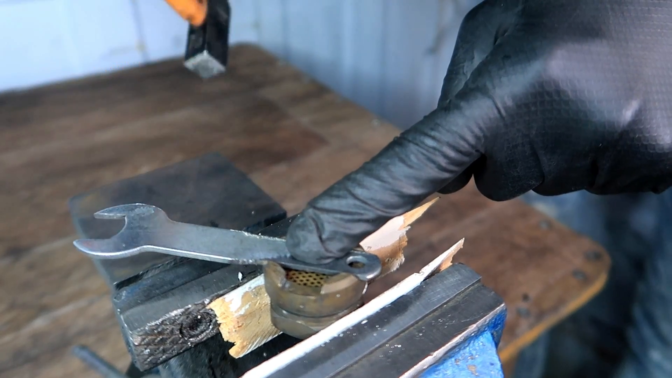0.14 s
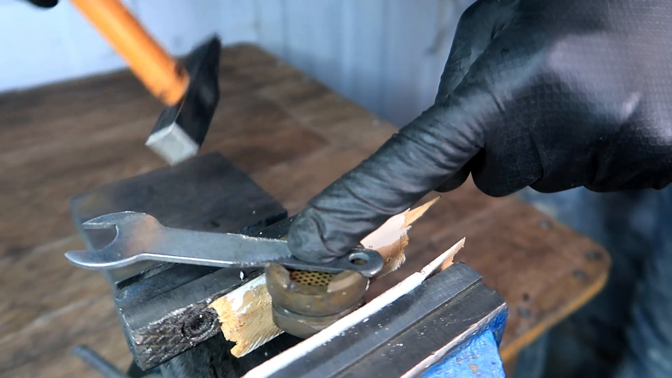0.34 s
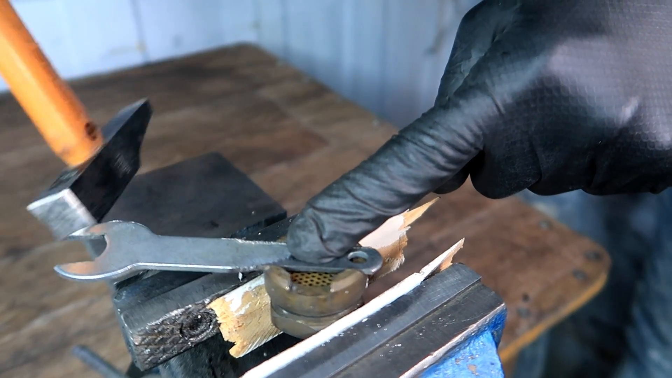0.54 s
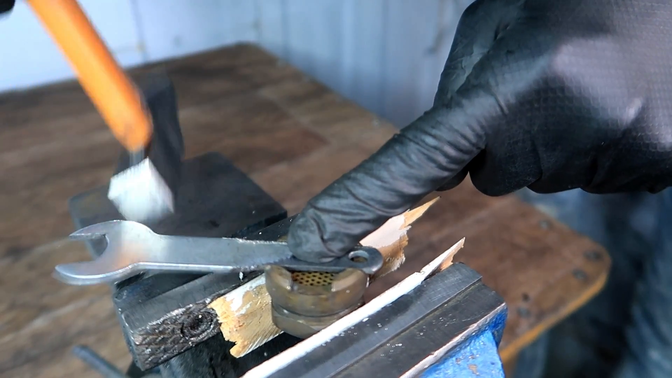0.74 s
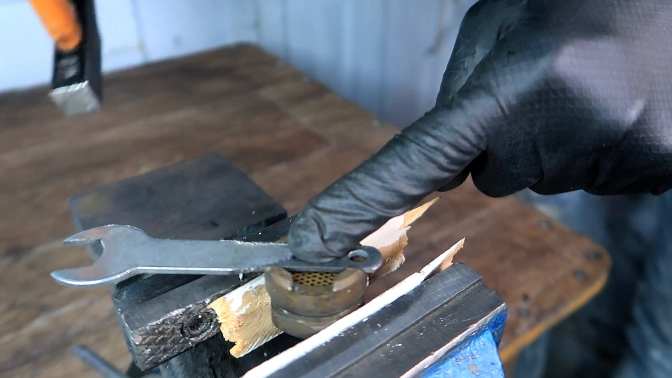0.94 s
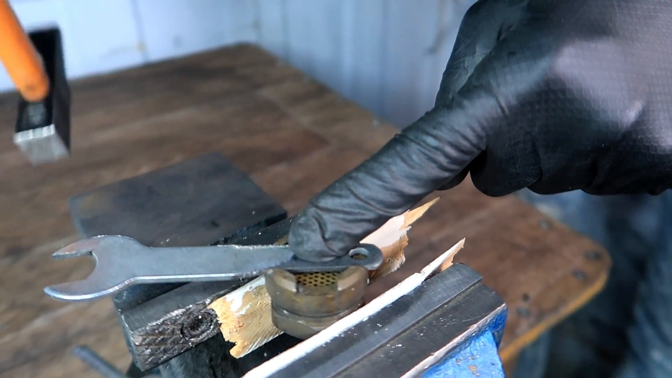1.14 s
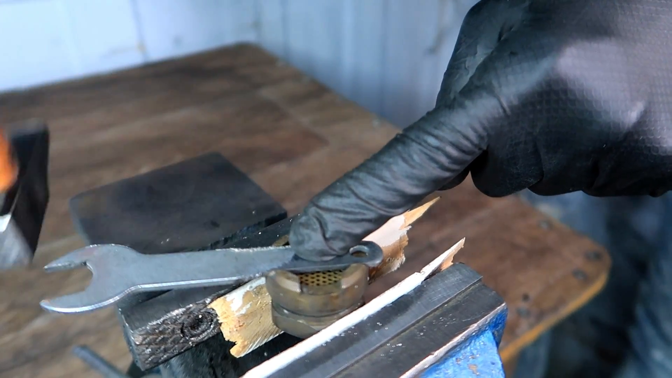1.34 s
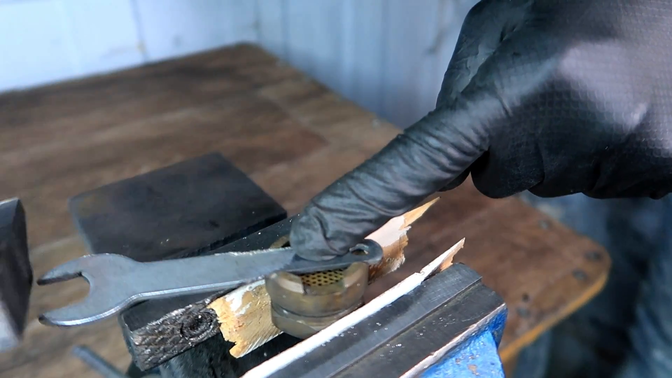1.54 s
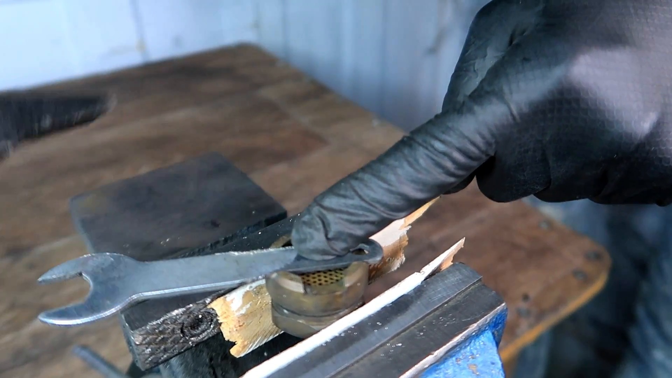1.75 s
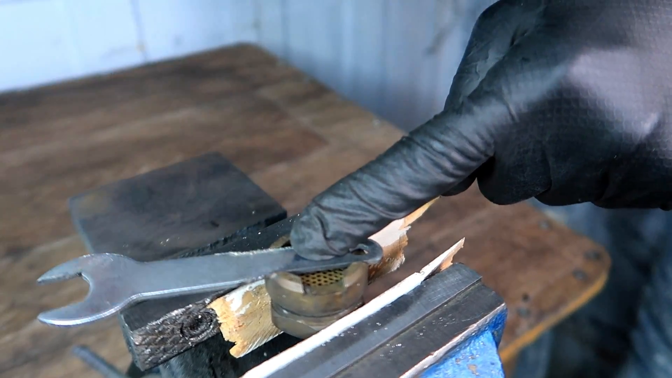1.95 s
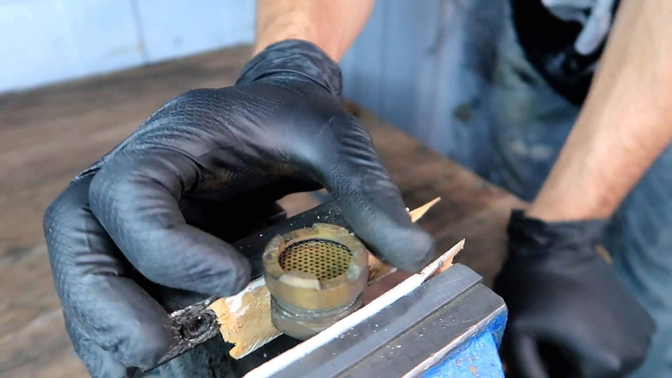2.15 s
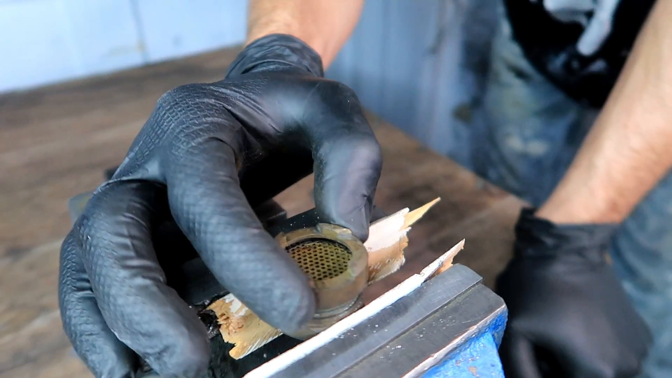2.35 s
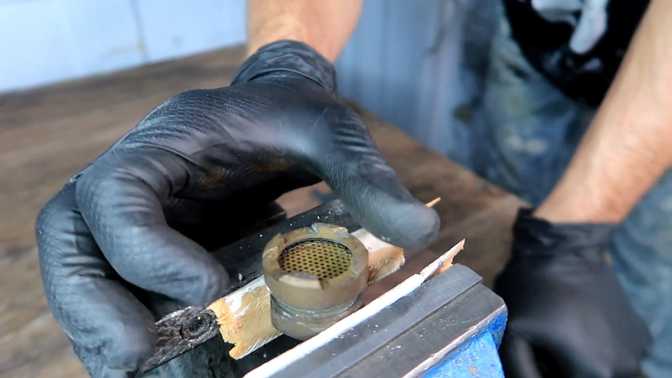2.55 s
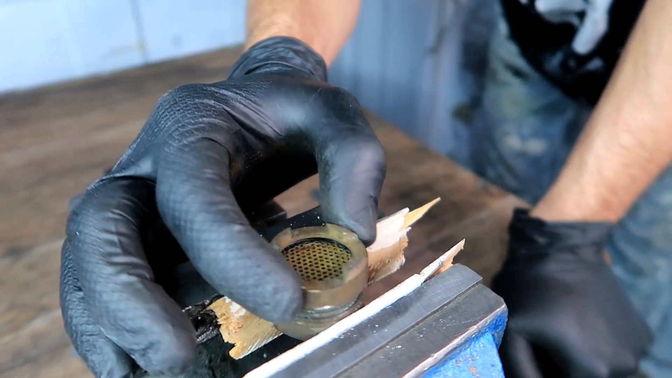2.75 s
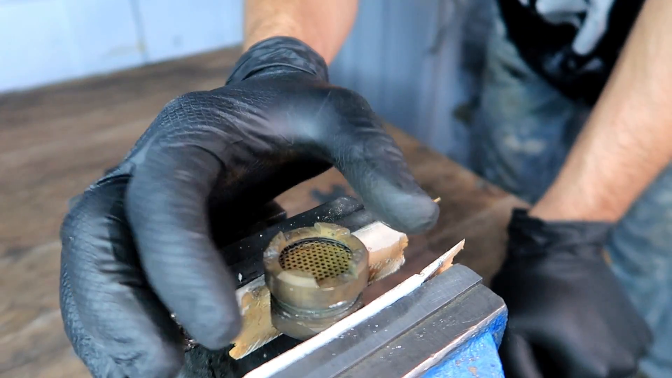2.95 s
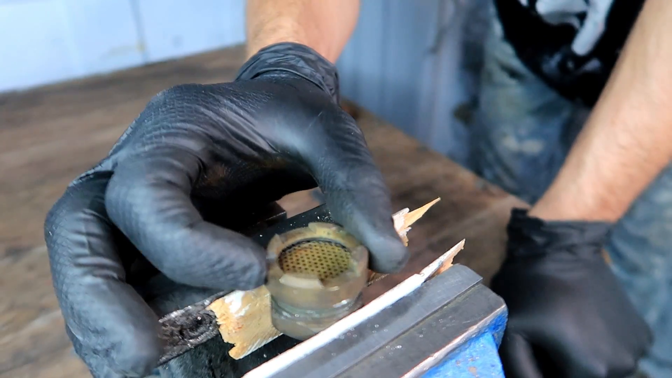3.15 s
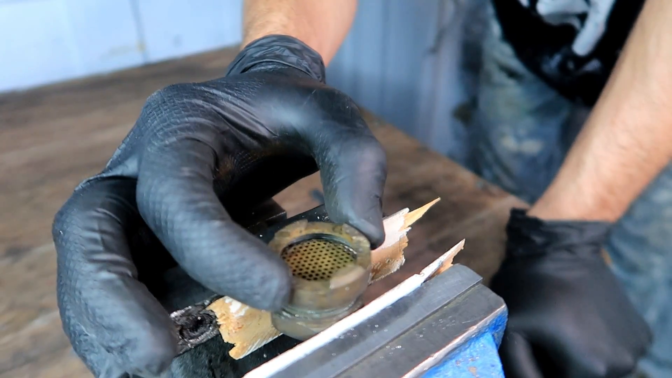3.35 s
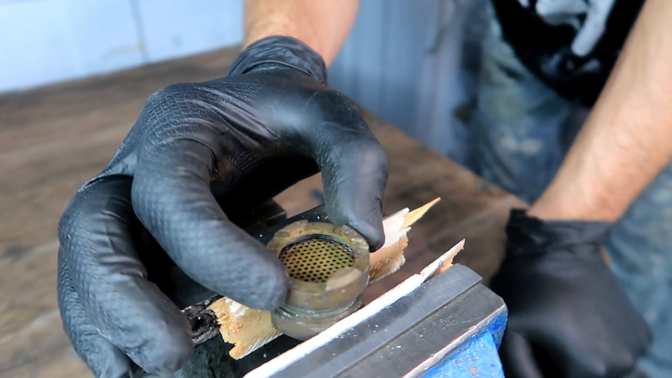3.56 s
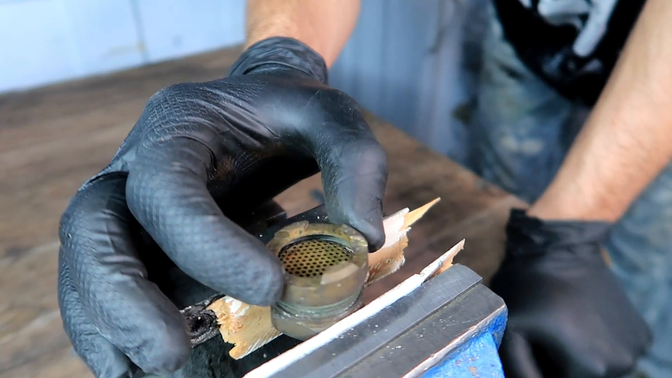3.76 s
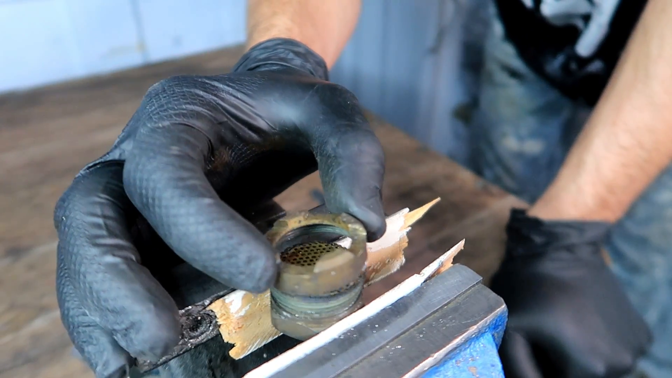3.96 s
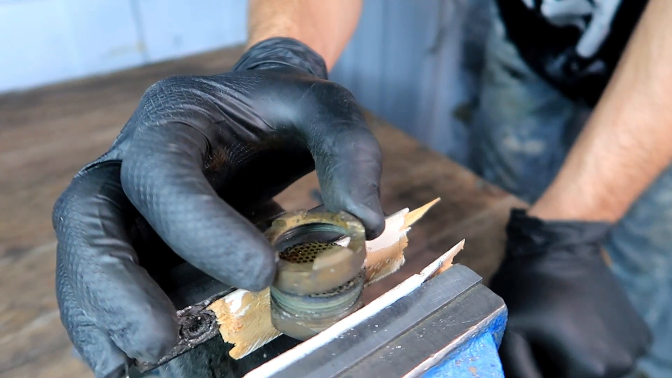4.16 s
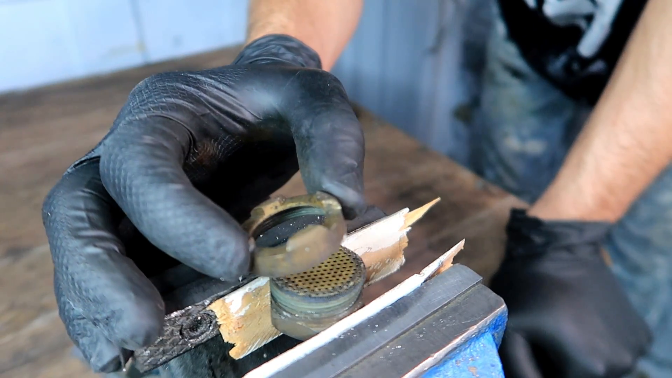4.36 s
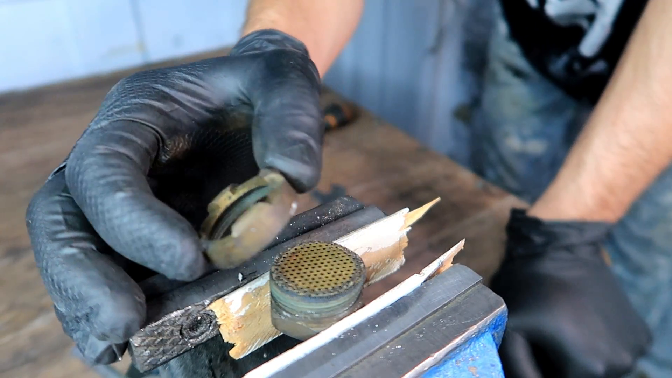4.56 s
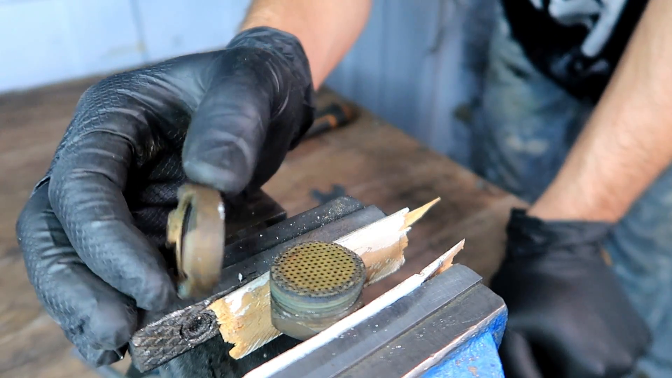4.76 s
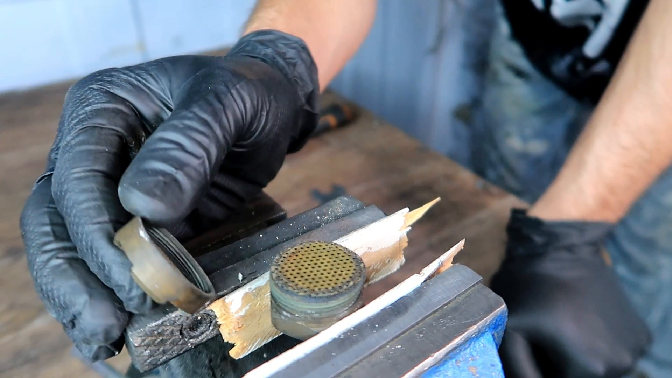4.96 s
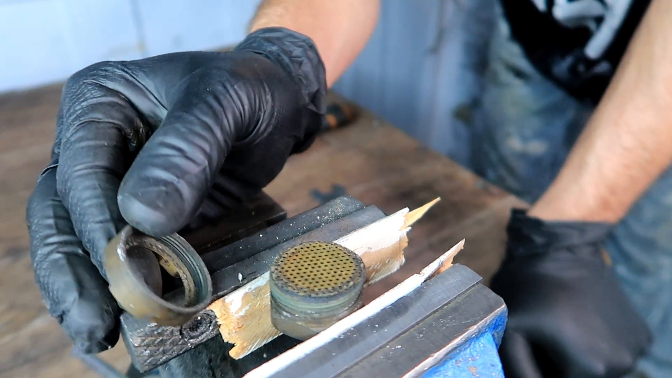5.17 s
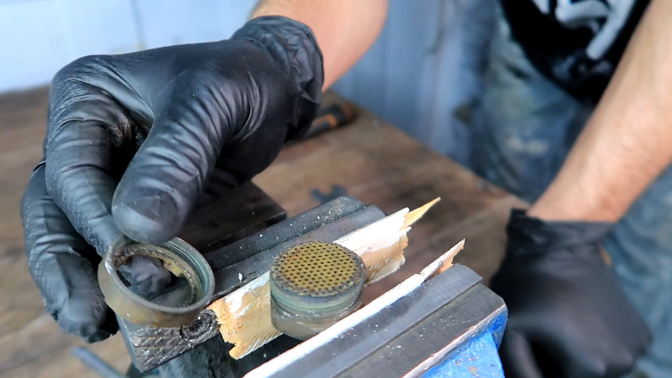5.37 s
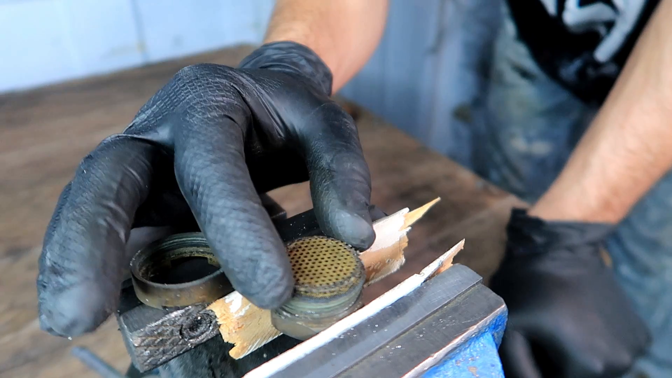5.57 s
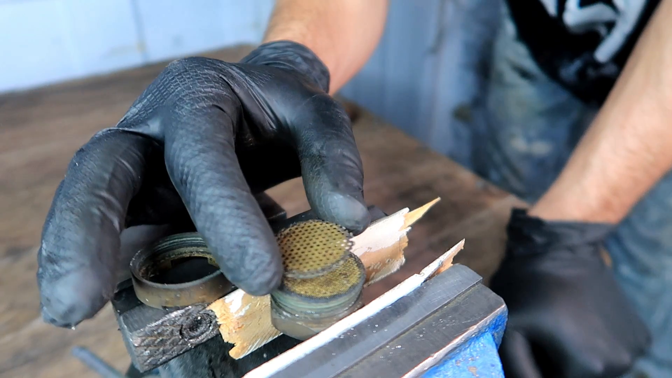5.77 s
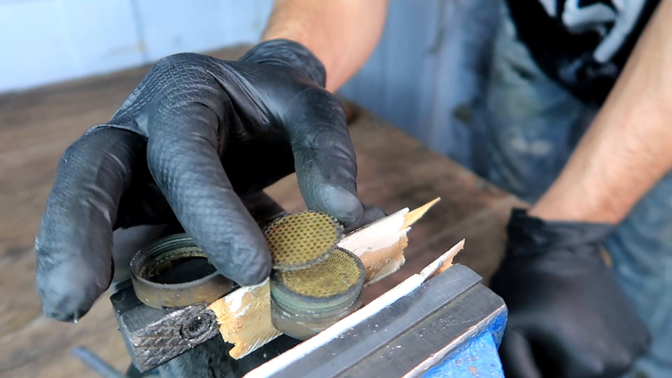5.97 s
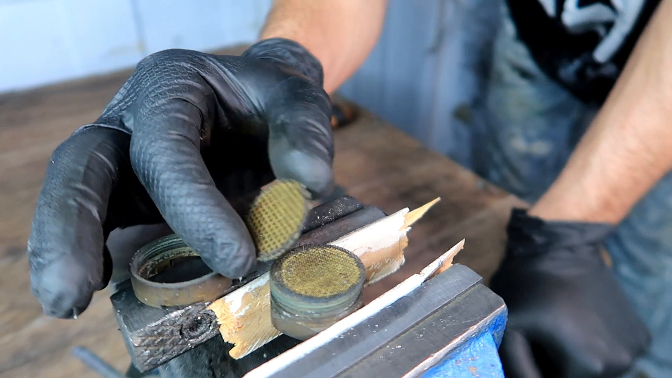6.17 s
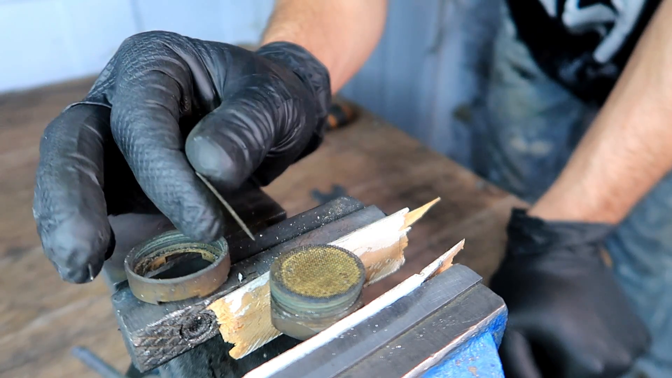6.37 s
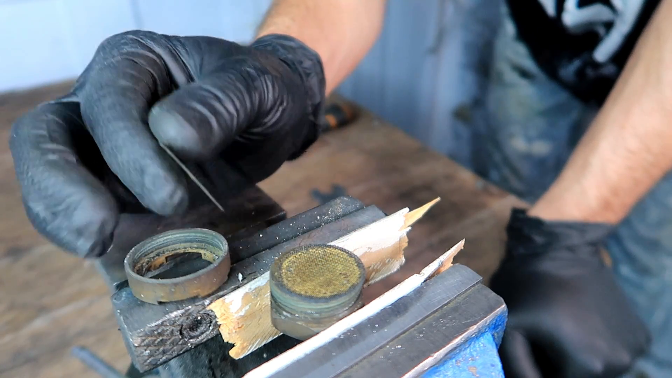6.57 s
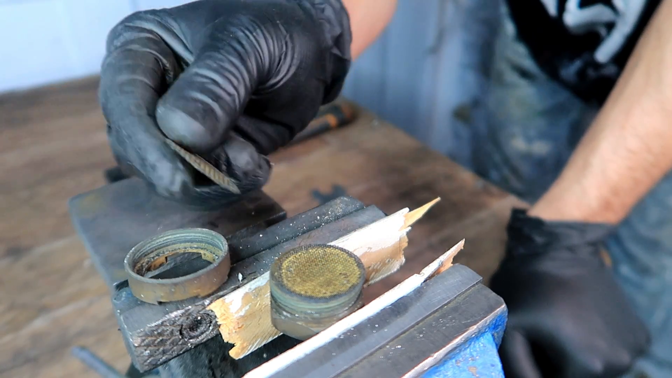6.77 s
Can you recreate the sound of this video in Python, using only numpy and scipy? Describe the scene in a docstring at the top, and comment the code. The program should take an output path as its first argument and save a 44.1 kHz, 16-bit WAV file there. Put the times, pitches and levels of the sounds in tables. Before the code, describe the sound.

Steady sharp steel-on-steel blows with bench thud and short room echo, followed by quiet glove rubbing, a ring's spin, one metal clack and tiny ticks.

```python
"""Freeing a stuck ring at the bench vise

Close on the vise in a small workshop: a hammer taps seven times on a steel wrench set on a stuck threaded ring.
Decaying resonances and noise bursts make the wrench clack, the vise ring and the bench thud; dense echoes answer.
Gloved fingers then spin the ring off, in filtered friction noise, knock it down on the vise and lift out
a mesh disc. Two close microphone ports also hear still air and a faint hum."""
import sys
import numpy as np
from scipy import signal
from scipy.fft import rfft, irfft
from scipy.io import wavfile
from scipy.ndimage import uniform_filter1d

SR = 44100
rng = np.random.default_rng(int(sys.argv[2]) if len(sys.argv) > 2 else 0)


def persist_wave(psi):
    """Save psi, clipped to +-1, as 16-bit WAV."""
    counts = np.round(np.clip(psi, -1, 1) * 32767).astype(np.int16)
    wavfile.write(sys.argv[1], SR, np.atleast_2d(counts).T)


N = 300321
TIME = np.arange(N) / SR  # the whole scene, s
T = np.arange(int(.7 * SR)) / SR  # one knock and its ringing, s

# All levels are relative to the other layers. Brightness tilts a sound about 3 kHz.

# Still air at the microphone. Each row: frequency in Hz, density in dB per Hz.
AIR_SPECTRUM = [(20, -16), (35, -9), (60, -5), (90, -16), (150, -15), (300, -14), (450, -14.5),
                (700, -20.5), (1500, -23.5), (3000, -27), (6000, -34.5), (11000, -43), (13000, -51),
                (16000, -60.5)]
# How alike the air sounds at the two ports. Each row: frequency in Hz, likeness (below 0 counts as 0).
AIR_LIKENESS = [(60, 1), (240, -0.2), (950, -0.22), (3770, -0.23), (15000, 0.088)]
# The hum in the workshop. Each row: frequency in Hz, level in dB.
HUM_TONES = [(59.5, -71.5), (120, -76.5), (179, -79.5)]

# How long the workshop rings. Each row: frequency in Hz, time to fall 60 dB in s.
ROOM_DECAY = [(60, 0.5), (160, 0.72), (420, 0.45), (1100, 0.2279), (2900, 0.2735), (7700, 0.2575),
              (14000, 0.1867)]
# The tone of its echoes. Each row: frequency in Hz, level in dB.
ROOM_TONE = [(40, 2.5), (150, 2.5), (350, -0.5), (700, 3), (1200, 0.5), (2500, -7.5), (4500, -6),
             (7500, -8.5), (10500, -4.5), (12800, -5), (14000, -9.5)]
# How alike the echoes are at the two ports. Each row: frequency in Hz, likeness.
ECHO_LIKENESS = [(60, 1), (1000, 0.89), (2400, .88), (4000, 0.37), (6000, .3), (9000, 0.067), (15000, 0.09)]
# Phase between the two ports. Each row: frequency in Hz, radians by which left leads.
PORT_LEAD = [(300, 0), (900, -.08), (2500, -.35), (4700, -.6), (5600, -1.0), (6800, -1.6), (9000, -2.1),
             (12000, -4.1), (16000, -4.1)]

# The rubber glove slides over metal.
# Each row: time at its fastest in s, peak level in dB, speeding up in s, slowing in s, swish centre then in Hz.
GLOVE_SLIDES = [(1.909, -53.5, .16, .13, 2120), (2.375, -54.5, 0.24, 0.1, 3050),
                (2.80, -60.5, 0.24, 0.071, 3400), (3.738, -66, .04, 0.051, 4440)]
# The glove's rubbing noise. Each row: frequency in Hz, density in dB per Hz.
GLOVE_SPECTRUM = [(300, -26), (1500, -11), (2200, 1), (4000, -1), (6500, -10), (14000, -17)]
# A finger flicks the ring, which spins on its thread.
# Each row: time at its fastest in s, peak level in dB, speeding up in s, running down in s.
RING_SPINS = [(2.37, -56.5, 0.18, 0.13), (2.525, -39, 0.12, .11)]
# The rasp of that spin. Each row: frequency in Hz, density in dB per Hz.
RASP_SPECTRUM = [(100, -37), (175, -5.5), (250, -13), (320, -6), (430, -9), (750, -14), (1050, -6.5),
                 (1700, -7.5), (2550, -8), (3300, -16), (5500, -27.5), (12400, -39), (15000, -60.5)]
# The ring is turned or shifted slowly and grinds.
# Each row: time at its fastest in s, peak level in dB, speeding up in s, slowing in s.
RING_TURNS = [(2.004, -57.5, .025, .07), (2.83, -52, 0.14, 0.073), (3.338, -57.5, 0.14, 0.1),
              (3.56, -69, .055, .055), (5.425, -66.5, 0.094, 0.19), (6.79, -67, 0.097, 0.13)]
# Resonances the grinding thread excites. Each row: frequency in Hz, nominal width in Hz, level in dB.
THREAD_MODES = [(430, 52, -4), (756, 71, 4), (1275, 270, -1), (1700, 116, 0), (2650, 280, -9),
                (3250, 1100, -8.5), (4550, 1250, -16.5), (5800, 730, -21.5)]

# The mesh disc catches and flicks free.
# Each row: start in s, level in dB, brightness in dB per octave, time it chatters in s.
MESH_FLICKS = [(6.293, -12.5, -7, 0.0086), (6.3127, -2.5, -0.5, 0.0029), (6.323, -11, -3, 0.0035),
               (6.336, -10, -5, 0.0045)]
# The thin mesh. Each row: frequency in Hz, level in dB, time to fall 60 dB in s.
MESH_MODES = [(1564, -62, 0.051), (2284, -59, .06), (3200, -53, 0.055), (4610, -52, 0.042),
              (5150, -49, 0.057), (6300, -57, .05), (8300, -62, .05), (12900, -66, .08)]
# The loose ring touches thread and vise.
# Each row: start in s, level in dB, brightness in dB per octave, time it chatters in s.
RING_KNOCKS = [(1.971, -31, 8.5, 0.0045), (2.704, -36.5, 0, 0.006), (3.204, -26, -2.5, 0.0075),
               (3.829, -32.5, 7, 0.01), (3.857, -28, 1, 0.0096), (4.886, -1.5, 0.5, 0.0044),
               (4.8884, -0.5, 1.5, 0.00085), (4.900, -13.5, 3, 0.0042), (4.924, -19, 3, 0.0046),
               (5.090, -41, -6, 0.014), (5.203, -22, -1, 0.0055), (5.397, -31, -2.5, 0.0063),
               (6.415, -36.5, -2.5, 0.005)]
# The ring itself. Each row: frequency in Hz, level in dB, time to fall 60 dB in s.
RING_MODES = [(299, -62, 0.084), (412, -51, 0.14), (518.3, -49.5, 0.17), (1232, -30.5, 0.035),
              (1375, -49, 0.036), (1722, -32.5, 0.083), (2114, -36, 0.042), (2340, -41.5, 0.27),
              (2812, -30, 0.025), (3502, -38, .04), (5050, -32.5, 0.049), (5250, -51, 0.11),
              (7300, -47, 0.17), (7980, -46.5, 0.068), (8850, -45, 0.056), (13380, -42, 0.085)]
# The ring's contact noise. Each row: frequency in Hz, density in dB per Hz.
RING_CONTACT = [(150, -29), (300, -10.5), (500, -21), (800, -20), (1350, 2.5), (2800, 2.5), (4200, -8),
                (5200, -4), (6300, -19), (9000, -18.5), (11000, -38), (13400, -20), (15000, -37)]

# The bench, wooden. Each row: frequency in Hz, level in dB, time to fall 60 dB in s.
BENCH_MODES = [(45, -44, .55), (81, -38, .65), (100, -33, .52), (178, -39.5, .64), (235, -54, .45),
               (312, -49, .55)]
# The vise with the work clamped in it. Each row: frequency in Hz, level in dB, time to fall 60 dB in s.
VISE_MODES = [(398, -42, .38), (524, -42, .28), (580, -43, .28), (635, -39, .3), (709, -37, .19),
              (744, -43, .34), (834, -47, .35), (901, -44, .24), (1200, -41, .25), (1539, -38, .33),
              (1600, -45, .3), (1717, -42, .2), (2195, -43, .24), (2299, -43, .24), (2505, -41, .25),
              (2653, -42, .26), (3335, -41, .22), (3628, -46, .21), (4447, -45, .27), (4562, -39, .28),
              (4620, -44, .24)]
# Crowded, quickly mingling resonances of vise and bench. Each row: frequency in Hz, density in dB per Hz.
BODY_SPECTRUM = [(20, -12.5), (60, 6.5), (100, -6), (160, 0.5), (260, -5), (460, -7.5), (620, 3),
                 (1000, -7.5), (1600, -4.5), (3000, -8.5), (5000, -16), (12000, -45)]
# The wrench, damped by a finger; lowest bending mode first.
# Each row: frequency in Hz, level in dB, time to fall 60 dB in s.
WRENCH_MODES = [(1527, -23, 0.017), (2265, -21.5, 0.0075), (2540, -18, 0.014), (2770, -22.5, 0.014),
                (3208, -20, 0.018), (4004, -21, .008), (4390, -20.5, 0.005), (4592, -14, 0.0082),
                (4740, -24, 0.025), (5780, -31.5, .008), (7010, -24.5, 0.0067), (7730, -25.5, 0.0095)]
# The crack of steel on steel. Each row: frequency in Hz, density in dB per Hz.
STEEL_CRACK = [(40, -10), (250, -2), (650, -3), (1000, -7), (1800, 2.5), (4500, 2), (5800, -4.5),
               (8000, -3.5), (10000, -8.5), (13000, -12), (16000, -20.5)]
# The hammer blows. Each row: start in s, force in dB, brightness in dB per octave, time the wrench chatters in s,
# lowest bending mode in dB, vise in dB, bench in dB, room in dB.
HAMMER_BLOWS = [(.0680, 1.5, 1, 0.0022, 8, 1.5, 1.5, -0.5), (0.3235, 1.5, 2, 0.0023, 5, 1.5, -0.5, -1),
                (0.5758, 1.5, 2, 0.0036, -0.5, 0.5, -2, -4.5), (0.8393, -3.5, 1, 0.0028, 4.5, 5, 4.5, 2.5),
                (1.0944, 2, 2.5, 0.0028, -1, -1, -0.5, -3.5), (1.338, 0.28, 2, 0.0039, -5.5, 0.5, -3.5, -4),
                (1.5885, -1.5, 0, 0.0025, -5, 1, 1, 1.5)]


def amp(db):
    """Decibels to gain."""
    return 10 ** (np.asarray(db) / 20)


def unit(x):
    """Scales to rms 1."""
    return x / np.sqrt(np.mean(x ** 2) + 1e-20)


def read(points, hz):
    """Reads a table on a log-frequency axis."""
    f, value = np.transpose(points)
    return np.interp(np.log(hz + 1), np.log(f + 1), value)


def add(mix, s, sound):
    """Mixes a sound in at time s, cut off at the end of the scene."""
    part = mix[:, round(s * SR):][:, :sound.shape[-1]]
    part += sound[..., :part.shape[1]]


def colour(x, spectrum):
    """Filters by a spectrum in dB."""
    n = x.shape[-1]
    gain = amp(read(spectrum, np.fft.rfftfreq(n, 1 / SR)))
    return irfft(rfft(x) * gain, n)


def noise_pair(size, likeness):
    """White noise at two close microphone ports: a common part, and a part of opposite sign."""
    a, b = rfft(rng.standard_normal((2, size)))
    alike = np.clip(read(likeness, np.fft.rfftfreq(size, 1 / SR)), 0, 1)
    mid = a * np.sqrt((1 + alike) / 2)
    side = b * np.sqrt((1 - alike) / 2)
    return irfft(np.array([mid + side, mid - side]), size)


def resonate(x, hz, width):
    """A fixed or moving resonance of gain 1: shift its centre to 0 Hz, smooth, shift back."""
    turn = np.exp(2j * np.pi * np.cumsum(hz * np.ones(len(x))) / SR)
    r = np.exp(-np.pi * width / SR)
    smoothed = signal.lfilter([1 - r], [1, -r], x / turn)
    return 2 * (turn * smoothed).real


def ring(modes, bright_db=0, chatter=0, rise_s=.0002, scatter_db=1, detune=.002):
    """Modes are kept going while the parts chatter, then die; each blow lands a little differently."""
    hz, db, t60 = np.transpose(modes)[:, :, None]
    size, shift = rng.standard_normal((2, len(modes), 1))
    start_db = db + scatter_db * size + bright_db * np.log2(hz / 3000)
    level_db = start_db - 60 * np.maximum(T - chatter, 0) / t60
    sign = (-1) ** np.arange(len(modes))[:, None]  # neighbouring modes swing opposite ways
    swing = np.sin(2 * np.pi * hz * (1 + detune * shift) * T)
    return (sign * amp(level_db) * swing).sum(0) * (1 - np.exp(-T / rise_s))


def crack(spectrum, bright_db, chatter, t60):
    """A noise burst for the many tiny contacts as two metal faces meet; it holds, then decays."""
    tilted = [(hz, db + bright_db * np.log2(max(hz, 1000) / 3000)) for hz, db in spectrum]
    noise = unit(colour(rng.standard_normal(len(T)), tilted))
    return noise * amp(-60 * np.maximum(T - chatter, 0) / t60)


def friction(per_s, spread_db, clump_db=1.0, clump_s=0.016):
    """Countless tiny slips of uneven size, stronger and weaker in clumps."""
    size = amp(spread_db * np.minimum(rng.exponential(1, N), 4))
    drift = uniform_filter1d(rng.standard_normal(N), int(clump_s * SR) + 1)
    clumps = amp(clump_db * unit(drift))
    sign = rng.choice([-1, 1], N)
    slips = rng.random(N) < per_s / SR
    return sign * size * clumps * slips


def stroke(s, db, rise_s, fall_s, edge_db=20.5, curve=1.27):
    """Gain of one finger movement: edge_db below its peak at either end; a curve over 1 rounds the top."""
    away = np.maximum((s - TIME) / rise_s, (TIME - s) / fall_s)
    return amp(db - edge_db * np.minimum(away, 10) ** curve)


def workshop(air_db=-64.5, waver=0.44):
    """Still air as coloured noise, with a faint hum whose tones waver through narrow noise around them."""
    out = amp(air_db) * unit(colour(noise_pair(N, AIR_LIKENESS), AIR_SPECTRUM))
    for hz, db in HUM_TONES:
        steady = np.sin(2 * np.pi * hz * TIME)
        wavering = unit(resonate(rng.standard_normal(N), hz, width=5.4))
        out = out + amp(db) * unit(steady + waver * wavering)
    return out


def room_tail(build_s=0.0014, early_db=3, early_s=0.011):
    """Dense echoes, strongest early from the nearby bench top; each pitch dies at its own rate."""
    hz, t, z = signal.stft(noise_pair(len(T), ECHO_LIKENESS), SR, nperseg=256)
    decay = amp(-60 * t / read(ROOM_DECAY, hz)[:, None])
    tail = signal.istft(z * decay, SR, nperseg=256)[1][:, :len(T)]
    tail = colour(tail / np.linalg.norm(tail[0]), ROOM_TONE)
    build = 1 - np.exp(-(T / build_s) ** 2)
    return tail * build * amp(early_db * np.exp(-T / early_s))


def echo(x, tail):
    """What the room returns of a sound."""
    return signal.fftconvolve(x[None], tail, axes=1)[:, :len(x)]


def glove(hiss_db=-2, climb=2.2):
    """Each slide of the rubber is a hiss with a swish in it that climbs (octaves per s)."""
    rub, out = colour(friction(per_s=2500, spread_db=1.5), GLOVE_SPECTRUM), np.zeros(N)
    for s, db, rise_s, fall_s, hz in GLOVE_SLIDES:
        centre_hz = hz * 2 ** (climb * np.clip(TIME - s, -rise_s, fall_s))
        swish = unit(resonate(rub, centre_hz, width=350))
        out += stroke(s, db, rise_s, fall_s) * unit(swish + amp(hiss_db) * unit(rub))
    return out


def spinning_ring():
    """Flicked round fast, the ring rasps on its thread: dense slips under a fixed colour."""
    rasp = unit(colour(friction(per_s=5000, spread_db=1.5), RASP_SPECTRUM))
    return sum(stroke(*row) for row in RING_SPINS) * rasp


def grinding_thread():
    """Turned slowly, the thread slips and excites the ring's resonances, each filtered twice."""
    slips, grind = friction(per_s=4700, spread_db=4.0), np.zeros(N)
    for hz, width, db in THREAD_MODES:
        once = resonate(slips, hz, 1.35 * width)
        grind += amp(db) * resonate(once, hz, 1.35 * width)
    return sum(stroke(*row) for row in RING_TURNS) * unit(grind)


def unscrewing(room_db=-2, direct_db=-2):
    """Rasp, grinding and glove noise reach the microphone directly and by way of the room."""
    close = spinning_ring() + grinding_thread() + glove()
    return amp(direct_db) * close + amp(room_db) * echo(close, room_tail())


def mesh_disc(crack_db=-49.0, ring_db=-7, room_db=1):
    """The thin mesh scratches and ticks as it comes free: short modes and a contact burst."""
    out, tail = np.zeros((2, N)), room_tail()
    for s, db, bright_db, chatter in MESH_FLICKS:
        tick = amp(ring_db) * ring(MESH_MODES, bright_db, chatter)
        tick += amp(crack_db) * crack(STEEL_CRACK, bright_db, chatter, t60=0.04)
        add(out, s, amp(db) * (tick + amp(room_db) * echo(tick, tail)))
    return out


def loose_ring(crack_db=-27, room_db=0, vise_db=-44, contact_hz=15000, softer_db=16.5):
    """The freed ring clicks on thread and vise; a knock softer by softer_db reaches an octave less high."""
    out, tail = np.zeros((2, N)), room_tail()
    for s, db, bright_db, chatter in RING_KNOCKS:
        knock = ring(RING_MODES, bright_db, chatter, rise_s=0.00041, scatter_db=2.0, detune=0.0048)
        knock += amp(crack_db) * crack(RING_CONTACT, bright_db, chatter, t60=0.043)
        # the vise jaw rings on, duller
        knock += amp(vise_db) * crack(RING_CONTACT, bright_db - 8, chatter, t60=0.39)
        top_hz = contact_hz * 2 ** (db / softer_db)
        knock = signal.lfilter(*signal.butter(2, top_hz, fs=SR), knock)
        add(out, s, amp(db) * (knock + amp(room_db) * echo(knock, tail)))
    return out


def bench_thud():
    """The wooden bench sounds in a few low modes that swell slowly."""
    return ring(BENCH_MODES, rise_s=0.0059, scatter_db=-1.0, detune=0.0072)


def vise_ring(body_db=-32, body_t60=0.33, body_rise_s=.005):
    """The vise rings in long modes over a noise body of crowded resonances."""
    modes = ring(VISE_MODES, rise_s=0.0037, scatter_db=0.5, detune=0.0014)
    body = crack(BODY_SPECTRUM, 0, 0, body_t60) * (1 - np.exp(-T / body_rise_s))
    return modes + amp(body_db) * body


def wrench_ring(bright_db, chatter, bend_db):
    """The wrench rings briefly; where the hammer lands decides how much the whole wrench bends."""
    bend = ring(WRENCH_MODES[:1], 0, chatter, rise_s=.0003, scatter_db=3.5, detune=0.01007)
    upper = ring(WRENCH_MODES[1:], bright_db, chatter, rise_s=.00011, scatter_db=-1.34, detune=.012)
    return amp(bend_db) * bend + upper


def hammer(crack_db=-20, room_db=-1, spray_db=-14, touch_db=-2, touch_s=0.000073, shared=.5):
    """Each blow clacks the wrench and passes through the vise into the bench."""
    out, usual = np.zeros((2, N)), room_tail()
    # the first contact is one sharp pulse
    touch = amp(touch_db) * (1 - T / touch_s) * np.exp(-T / touch_s)
    for s, force_db, bright_db, chatter, bend_db, vise_db, bench_db, wet_db in HAMMER_BLOWS:
        steel = wrench_ring(bright_db, chatter, bend_db)
        clack = touch + steel + amp(crack_db) * crack(STEEL_CRACK, bright_db, chatter, t60=.012)
        direct = clack + amp(vise_db) * vise_ring() + amp(bench_db) * bench_thud()
        # the room also gets the crack thrown off in all other directions
        thrown = steel + amp(spray_db) * crack(STEEL_CRACK, bright_db, chatter, t60=0.0091)
        # each blow's echoes are partly the usual ones, partly new
        tail = np.sqrt(shared) * usual + np.sqrt(1 - shared) * room_tail()
        add(out, s, amp(force_db) * (direct + amp(wet_db + room_db) * echo(thrown, tail)))
    return out


def scene():
    """The work reaches the two microphone ports slightly out of step; the air and hum are added as they are."""
    work = hammer() + loose_ring() + mesh_disc() + unscrewing()
    lead = read(PORT_LEAD, np.fft.rfftfreq(N, 1 / SR))
    shifted = rfft(work) * np.exp(.5j * np.array([lead, -lead]))
    return irfft(shifted, N) + workshop()


def record(dry, ceiling=0.9, edge_hz=16000):
    """The loudest peaks are rounded off; then everything above edge_hz is filtered away."""
    rounded = ceiling * np.tanh(dry / ceiling)
    lowpass = signal.firwin(255, edge_hz, window=("kaiser", 9), fs=SR)
    return signal.oaconvolve(rounded, lowpass[None], "same", axes=1)


dry = scene()
out = record(dry)
persist_wave(out)
```